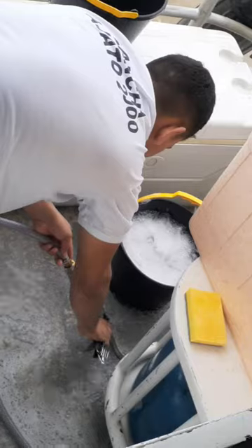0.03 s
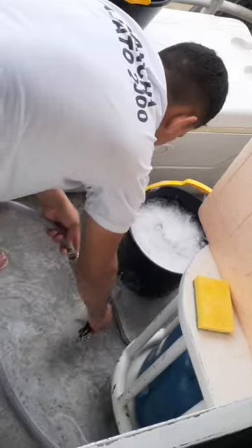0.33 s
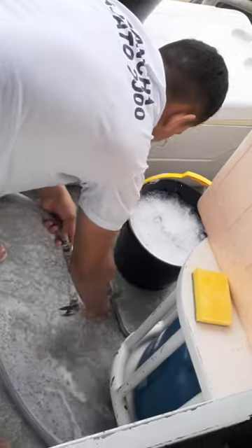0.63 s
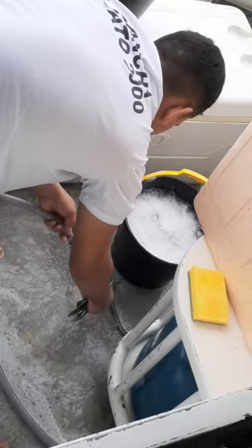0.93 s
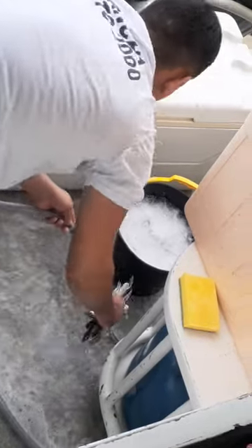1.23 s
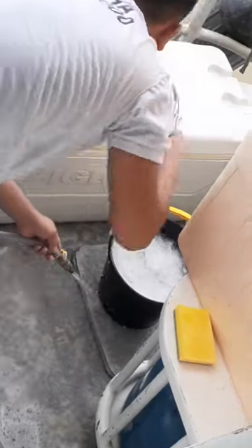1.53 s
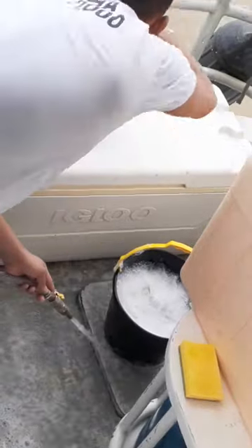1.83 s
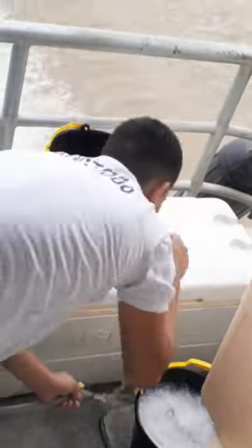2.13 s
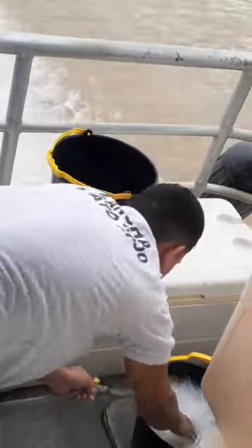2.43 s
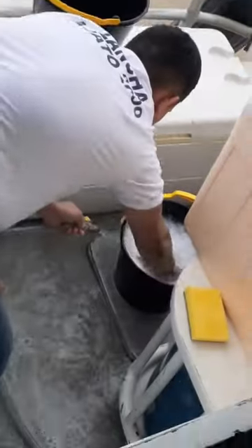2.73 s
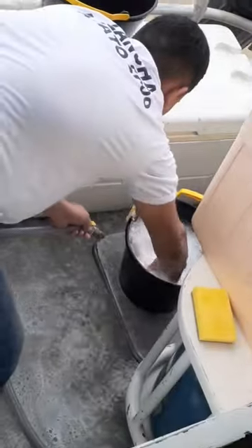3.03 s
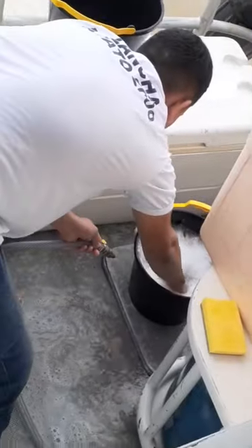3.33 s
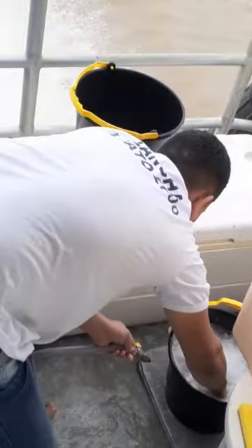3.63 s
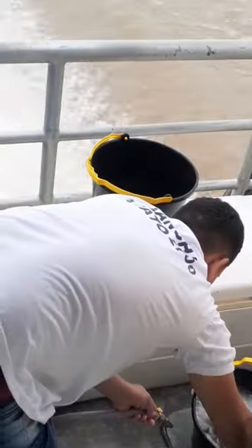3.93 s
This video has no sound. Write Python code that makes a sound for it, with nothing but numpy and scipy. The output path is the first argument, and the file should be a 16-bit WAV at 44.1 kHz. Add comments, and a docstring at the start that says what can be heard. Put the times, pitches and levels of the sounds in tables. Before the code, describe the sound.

The low, throbbing drone of a boat engine runs throughout, heard on deck over a rush of water and a faint whistle. Midway, a handful of cutlery rattles once nearby, and the drone carries on unchanged.

```python
"""A low, steady drone comes first: a four-cylinder diesel running under the deck of a river boat.
A second shaft hums and beats against its firing note, over the roar of engine and rushing water.
A thin turbocharger whistle warbles with every engine cycle. About two seconds in, a deckhand briefly
rattles a bundle of washed cutlery: the pieces jingle, and the handles knock and scrape together."""
import sys
import numpy as np
from scipy import signal
from scipy.fft import rfft, irfft
from scipy.io import wavfile
from scipy.ndimage import uniform_filter1d

SR = 44100
rng = np.random.default_rng(int(sys.argv[2]) if len(sys.argv) > 2 else 0)


def generate_wav(signal):
    """Clip the signal to [-1, 1] and save it as 16-bit WAV at the path in sys.argv[1]."""
    frames = np.transpose(np.atleast_2d(signal))
    scaled = np.clip(frames, -1, 1) * 32767
    pcm = np.round(scaled).astype(np.int16)
    wavfile.write(sys.argv[1], SR, pcm)


N = 176400
TIME, FREQS = np.arange(N) / SR, np.fft.rfftfreq(N, 1 / SR)
CYCLE_HZ, CYLINDERS = 16.171, 4  # each cylinder fires once per cycle
SPEED_WANDER = 0.000683  # share of the speed
TOP_HZ = 15600  # upper edge of the sound
HANDLE_SIDES_DB = [[0], [-5]]  # the handles are louder on the left


def amp(db):
    """Turns decibels into a gain."""
    return 10 ** (np.asarray(db) / 20)


def unit(x):
    """Scales a signal to an average strength (rms) of one."""
    return x / np.sqrt(np.mean(np.abs(x) ** 2) + 1e-20)


def look_up(table, hz):
    """Reads a table's columns at any frequency, blending between rows."""
    row_hz, *columns = np.transpose(table)
    return np.array([np.interp(np.log(hz + 1), np.log(row_hz + 1), c) for c in columns])


def colour(x, gain):
    """Turns each frequency up or down by its own gain."""
    return irfft(rfft(x) * gain, N)


def drift(rate_hz):
    """A smooth random wobble, mostly slower than rate_hz."""
    slow = irfft(rfft(rng.standard_normal(1024)) / (1 + (FREQS[:513] / rate_hz) ** 4))
    return unit(np.interp(np.arange(N) / N, np.arange(len(slow)) / len(slow), slow))


def echoes(t, decay_s):
    """A dense cloud of echoes dying away, one for each ear."""
    return rng.standard_normal((2, len(t))) * np.exp(-t / decay_s)


# How alike the two ears sound, for the engine too (frequency [Hz], likeness [0-1])
EAR_LIKENESS = [(40, .99), (130, 0.95), (260, 0.89), (500, 0.68), (900, 0.12), (2000, 0), (15000, 0)]
# Tone of the roar (frequency [Hz], left level [dB per Hz], right level [dB per Hz])
ROAR_TONE = [(25, -66, -72), (45, -59, -62), (94, -46, -44), (162, -47, -44), (238, -44.5, -44.5),
             (278, -51, -53), (400, -54.5, -53.5), (464, -52.5, -53), (620, -55.5, -57), (820, -56.5, -59),
             (1065, -60.5, -58.5), (1280, -63.5, -66.5), (1630, -62.5, -61), (2200, -64, -65.5),
             (2900, -68, -64.5), (4740, -73.5, -71), (6600, -74, -73), (8000, -76, -77.5),
             (10400, -73, -74), (12100, -78, -71), (13500, -78, -75), (15000, -80, -79)]
# Narrow bands where the roar rings (centre [Hz], width [Hz], left level [dB], right level [dB])
ROAR_PEAKS = [(468, 51, -32.5, -37), (1600, 85, -57, -63), (9220, 110, -51, -57), (12100, 350, -56, -62)]

def roar(cycles, throb_depth=0.38, throb_below_hz=450, flicker_db=1.0):
    """Engine and water make a broad rush whose low part throbs with each firing."""
    shared, separate = rng.standard_normal((2, N))
    alike = look_up(EAR_LIKENESS, FREQS)[0]
    noise = np.array([shared, colour(shared, alike) + colour(separate, np.sqrt(1 - alike ** 2))])
    low = colour(noise, 1 / (1 + (FREQS / throb_below_hz) ** 4))
    throb = unit(1 + throb_depth * np.sin(2 * np.pi * CYLINDERS * cycles))
    noise = noise - low + low * throb
    # small patches of pitch and time flicker in level
    slices = signal.stft(noise, nperseg=512)[2]
    flicker = uniform_filter1d(rng.standard_normal(slices.shape[1:]), size=9, axis=0)
    flicker = unit(uniform_filter1d(flicker, size=10, axis=1))
    noise = signal.istft(slices * amp(flicker_db * flicker), nperseg=512)[1][:, :N]
    power = amp(look_up(ROAR_TONE, FREQS)) ** 2
    for centre, width, left, right in ROAR_PEAKS:
        bump = np.exp(-np.pi * ((FREQS - centre) / width) ** 2) / width
        power += amp([[left], [right]]) ** 2 * bump
    return colour(noise, np.sqrt(power * SR / 2))


def turbo_whistle(cycles, pitch_hz=10820, warble_hz=92, drift_hz=29, sides_db=(-39, -29)):
    """The turbocharger speeds up and sags once per engine cycle; deck echoes make it shimmer."""
    hz = pitch_hz + warble_hz * np.sin(2 * np.pi * cycles) + drift_hz * drift(rate_hz=55.4)
    tone = np.sin(2 * np.pi * np.cumsum(hz) / SR)
    deck = echoes(TIME[:SR // 8], decay_s=.04)
    return np.array([amp(db) * unit(signal.fftconvolve(tone, e)[:N]) for db, e in zip(sides_db, deck)])


# Handles sliding past each other (middle time [s], length [s], level [dB], pitch [Hz])
HANDLE_SCRAPES = [(2.07, .03, -29, 2030), (2.106, 0.034, -28.5, 2020), (2.189, .045, -28, 2300)]

def handle_scrapes(slips_per_s=1500, width_hz=1400):
    """Quick, tiny slips between the handles keep them ringing."""
    out = np.zeros((2, N))
    for middle, length, db, hz in HANDLE_SCRAPES:
        slips = rng.standard_normal((2, N)) * (rng.random(N) < slips_per_s / SR)
        ring = unit(colour(slips, 1 / (1 + (2 * (FREQS - hz) / width_hz) ** 2)))
        swell = np.exp(-(2 * (TIME - middle) / length) ** 2)
        out += amp(db) * ring * swell
    return out * amp(HANDLE_SIDES_DB)


# Shakes of the cutlery bundle (start time [s], length [s], level [dB])
BUNDLE_JOLTS = [(2.012, 0.051, -31.5), (2.055, 0.04, -33), (2.07, .066, -22.5), (2.141, 0.034, -24.5),
                (2.171, .036, -23.5), (2.207, 0.056, -27.5), (2.257, .016, -29), (2.294, 0.034, -31),
                (2.364, 0.02, -32)]
# Tone of the ringing metal (frequency [Hz], left relative level [dB], right relative level [dB])
JINGLE_TONE = [(702, -3, -7), (1490, 0, 5), (2200, 4, -7), (3000, -6, -2), (5000, -4.5, -5.5),
               (7500, -4, -6), (9900, -3, -5), (11400, 1, 4.5), (12400, 7, 2), (13500, 1, 4),
               (14500, 2, -2), (15400, -1, -1)]

def cutlery_jingle(pieces=10, tones=60, taps_per_s=3500, ring_s=.11):
    """Each jolt sets off a flurry of tiny taps; every piece rings with many tones of its own."""
    t, out = TIME[:SR // 4], np.zeros((2, N))
    shake = sum(amp(db) * ((TIME >= start) & (TIME < start + length))
                for start, length, db in BUNDLE_JOLTS)
    for _ in range(pieces):
        hz = rng.uniform(JINGLE_TONE[0][0], TOP_HZ, tones)
        strengths = amp(look_up(JINGLE_TONE, hz)) * rng.standard_normal((2, tones))
        ring = strengths @ np.sin(2 * np.pi * hz[:, None] * t) * amp(-60 * t / ring_s)
        taps = unit(rng.standard_normal(N) * (rng.random(N) < taps_per_s / pieces / SR))
        out += signal.oaconvolve((shake * taps)[None], ring / np.linalg.norm(ring), axes=1)[:, :N]
    return out * np.sqrt(2 / pieces)


# Hard knocks between the handles (time [s], level [dB], pitch [Hz])
HANDLE_KNOCKS = [(2.049, -15.5, 2060), (2.068, -18, 2140), (2.098, -10.5, 2084), (2.120, -15, 2140),
                 (2.167, -22, 2200), (2.18, -20, 2210), (2.188, -19, 2250), (2.207, -18, 2170)]
# Tones in one knock (frequency [times the pitch], relative level [dB], time to fade by 60 dB [s])
KNOCK_TONES = [(.4, -11, .025), (.62, -11, .02), (.93, -8, 0.037), (1, -5, 0.041), (1.1, -11, .025),
               (1.28, -9, .025), (2.05, -13, 0.017)]

def handle_knocks(rise_s=0.00055, echo_gain=0.96):
    """Handles held in the hand knock with a short, muted ring that bounces off deck and wall."""
    t, out = TIME[:SR // 8], np.zeros((2, N))
    for when, db, hz in HANDLE_KNOCKS:
        ring = sum(amp(level - 60 * t / fade_s)
                   * np.sin(2 * np.pi * (hz * ratio * t + rng.random((2, 1))))
                   for ratio, level, fade_s in KNOCK_TONES)
        ring *= np.minimum(t / rise_s, 1)
        deck = echoes(t, decay_s=0.01)
        bounced = signal.fftconvolve(ring, deck / np.linalg.norm(deck[0]), axes=1)[:, :len(t)]
        start = round(when * SR)
        out[:, start:start + len(t)] += amp(db) * (ring + echo_gain * bounced)
    return out * amp(HANDLE_SIDES_DB)


# Hum of the second shaft (frequency [Hz], left level [dB], right level [dB])
SHAFT_TONES = [(60.06, -35, -35), (73.75, -20, -20), (120.12, -39, -37), (147.5, -25, -24),
               (221.25, -39, -37)]

def shaft_hum(gain_db=-0.2):
    """The shaft's low tones lie close to the firing note, so together they pulse, or beat."""
    wandering_time = TIME + np.cumsum(SPEED_WANDER * drift(rate_hz=3.4)) / SR
    hum = sum(amp([[left], [right]]) * np.sin(2 * np.pi * (hz * wandering_time + rng.random()))
              for hz, left, right in SHAFT_TONES)
    return amp(gain_db) * np.sqrt(2) * hum


# The engine's standout tones (frequency [times the cycle rate], left level [dB], right level [dB])
STRONG_ENGINE_TONES = [(4, -20, -21), (5, -27, -32), (6, -26, -26), (8, -14, -14), (9, -31, -31),
                       (10, -29, -31), (11, -31, -32), (13, -31, -33), (14, -28, -32), (18, -29, -28),
                       (20, -33, -37), (21, -33, -33), (22, -29, -27), (24, -39, -46), (28, -40, -47),
                       (30, -37, -42), (32, -38, -38), (44, -41, -49), (52, -44, -39), (60, -45, -45),
                       (74, -46, -48), (104, -41, -50), (106, -46, -58)]
# Level of all its other tones (frequency [Hz], left level [dB], right level [dB])
OTHER_ENGINE_TONES = [(16, -63, -60), (48, -46, -46), (116, -34, -45), (200, -38, -54), (310, -50.5, -40),
                      (427, -49.5, -44), (563, -53, -44), (640, -48, -59), (730, -42.5, -50.5),
                      (1080, -55.5, -56), (1340, -64.5, -61), (1650, -52.5, -82), (2500, -62, -70)]

def diesel_engine(cycles, burst_decay_s=0.0041, scatter_db=1, strong_boost_db=0.22, flutter=.12):
    """Four firing bursts, shaped by the hull, repeat to make a drone of evenly spaced tones."""
    size, groups = 8192, 7  # points in one cycle; sets of tones that flutter together
    position, multiples = np.arange(size) / size, np.arange(1, 155)
    hz = multiples * CYCLE_HZ
    level = look_up(OTHER_ENGINE_TONES, hz) + scatter_db * rng.standard_normal((2, len(hz)))
    for multiple, left, right in STRONG_ENGINE_TONES:
        level[:, int(multiple) - 1] = left + strong_boost_db, right + strong_boost_db
    # the bursts set each tone's timing; higher tones are more out of step between the ears
    since_firing = (position * CYLINDERS % 1) / (CYLINDERS * CYCLE_HZ)
    bursts = rfft(rng.standard_normal(size) * np.exp(-since_firing / burst_decay_s))[multiples]
    apart_rad = .8 * (1 - look_up(EAR_LIKENESS, hz)[0]) ** .7 * rng.choice([-1, 1], len(hz))
    phase = np.angle(bursts) + np.array([apart_rad, -apart_rad])
    tones = amp(level) * np.exp(1j * phase) * size / np.sqrt(2)
    out = np.zeros((2, N))
    for group in range(groups):
        one_cycle = irfft(np.pad(tones * (multiples % groups == group), ((0, 0), (1, 0))), size)
        drone = np.array([np.interp(cycles % 1, position, side) for side in one_cycle])
        out += drone * (1 + flutter * drift(rate_hz=3.7))
    return out


def scene():
    """The turning engine drives the drone, throb and whistle; the cutlery is close by."""
    cycles = np.cumsum(CYCLE_HZ * (1 + SPEED_WANDER * drift(rate_hz=1.95))) / SR
    boat = diesel_engine(cycles) + shaft_hum() + roar(cycles) + turbo_whistle(cycles)
    return boat + cutlery_jingle() + handle_knocks() + handle_scrapes()


def record(dry, start_s=.115, fade_in_s=.002):
    """The microphone opens after a moment, rounds off the loudest peaks and cuts the highest treble."""
    opened = np.clip((TIME - start_s) / fade_in_s, 0, 1)
    rounded = opened * dry / (1 + dry ** 10) ** (1 / 10)
    treble_cut = signal.firwin(511, TOP_HZ, window=("kaiser", 9), fs=SR)
    return signal.oaconvolve(rounded, treble_cut[None], "same")


dry = scene()
out = record(dry)
generate_wav(out)
```